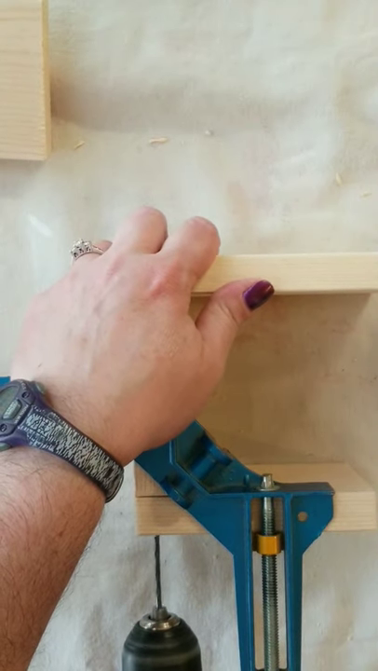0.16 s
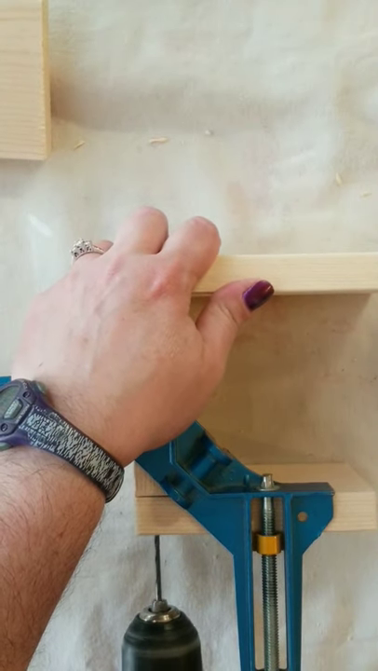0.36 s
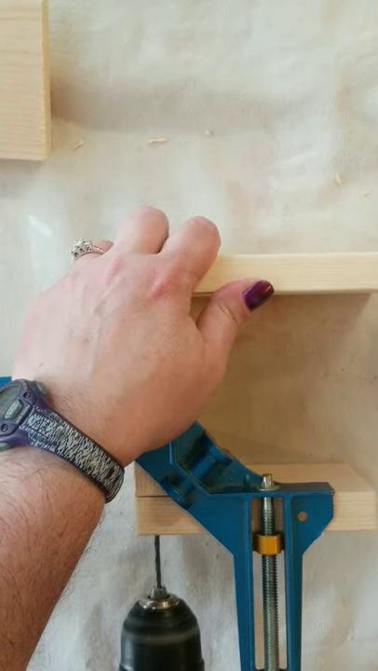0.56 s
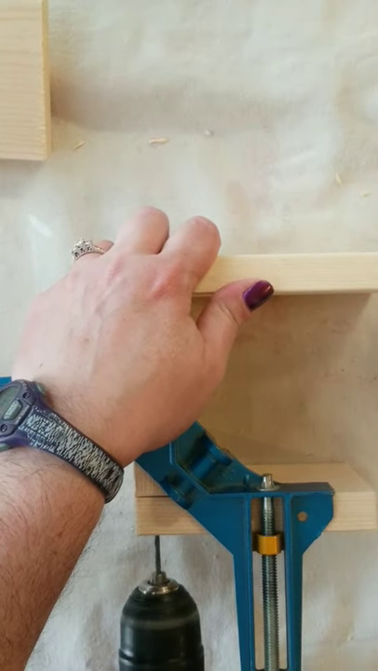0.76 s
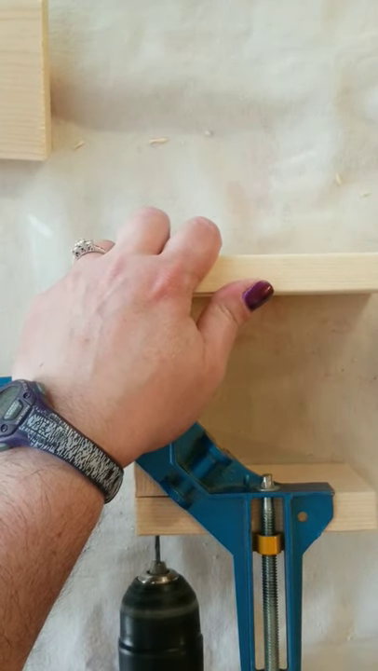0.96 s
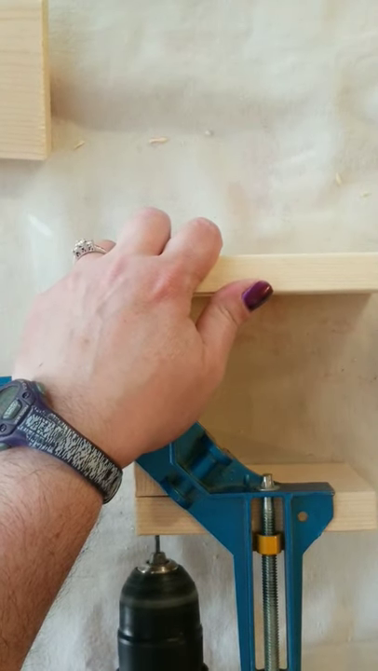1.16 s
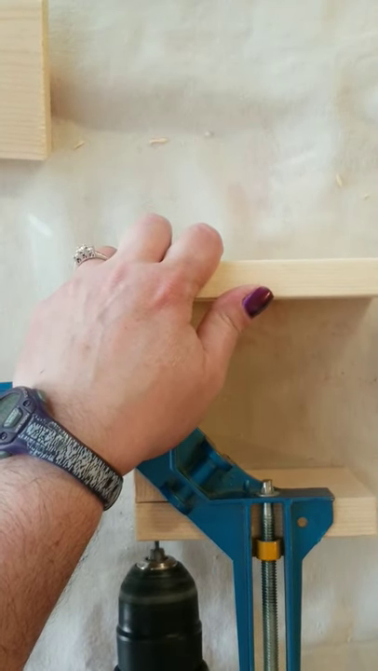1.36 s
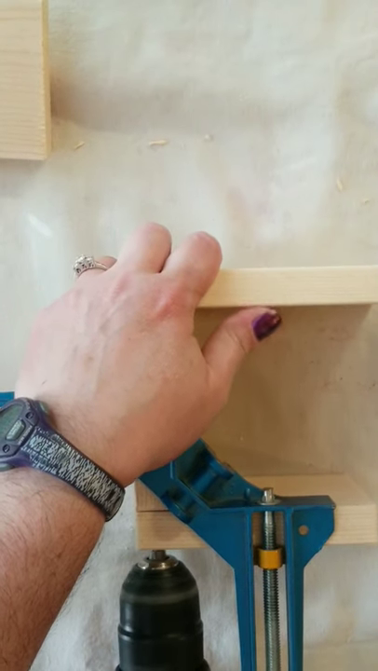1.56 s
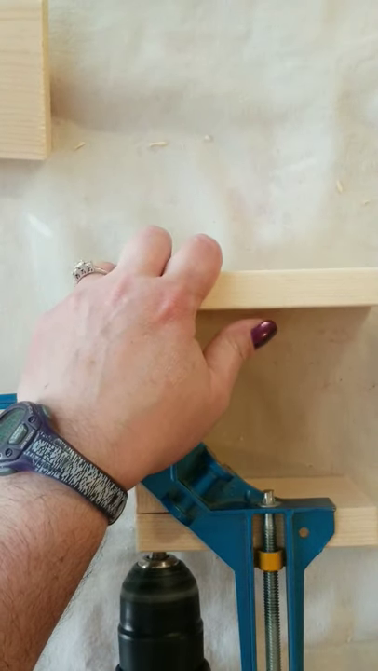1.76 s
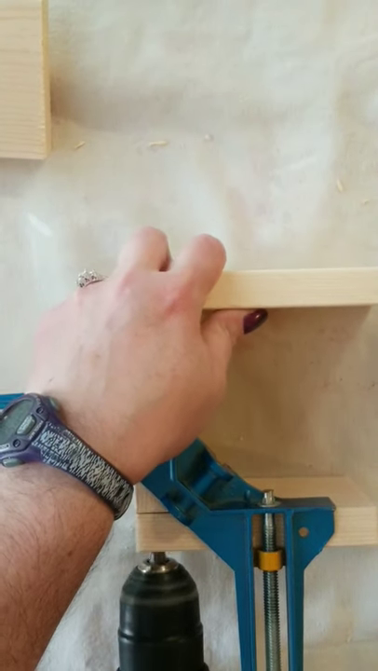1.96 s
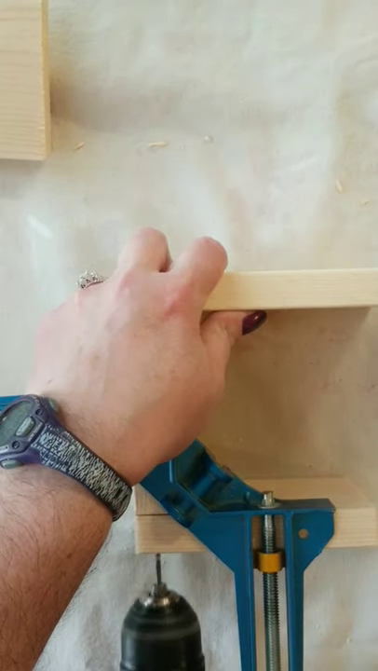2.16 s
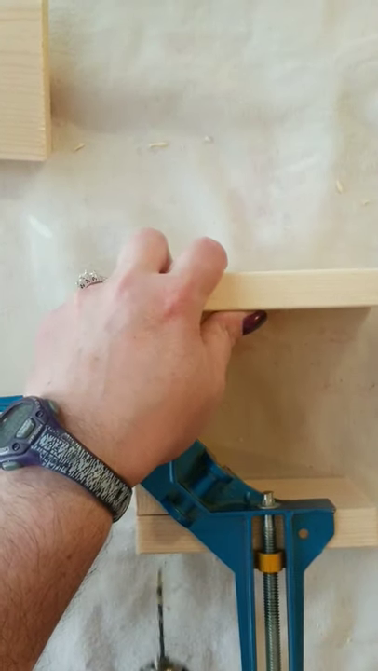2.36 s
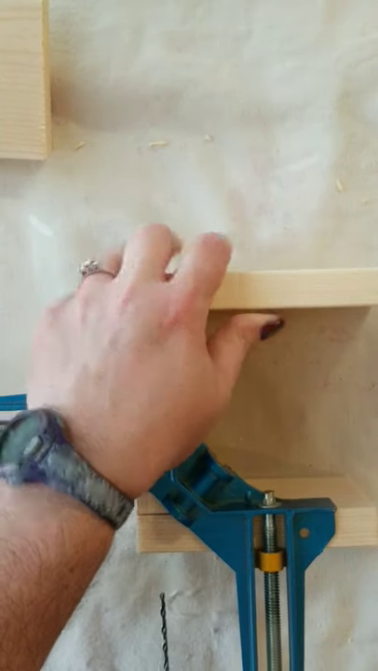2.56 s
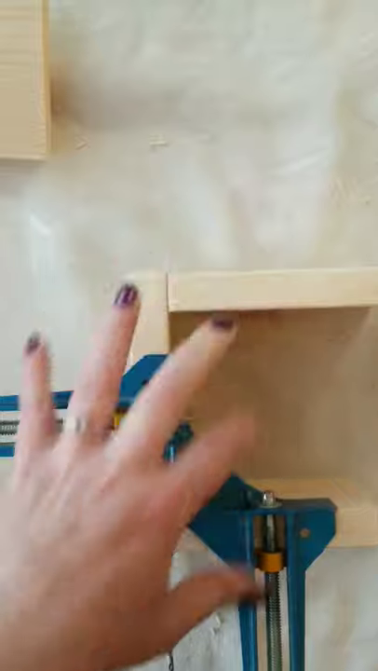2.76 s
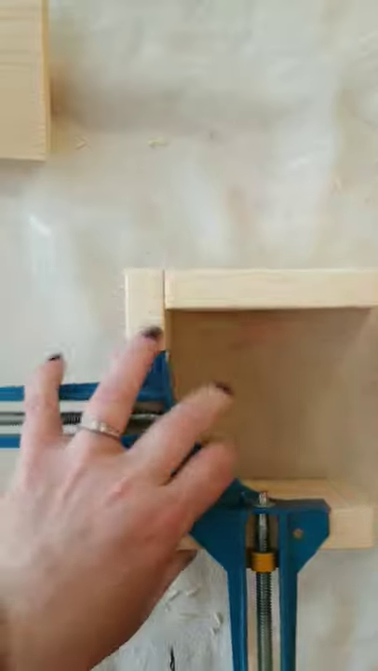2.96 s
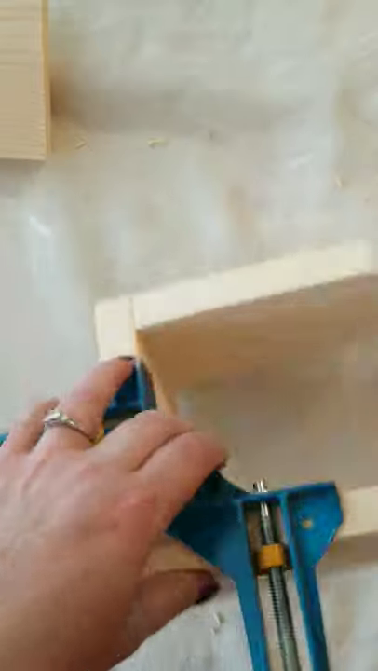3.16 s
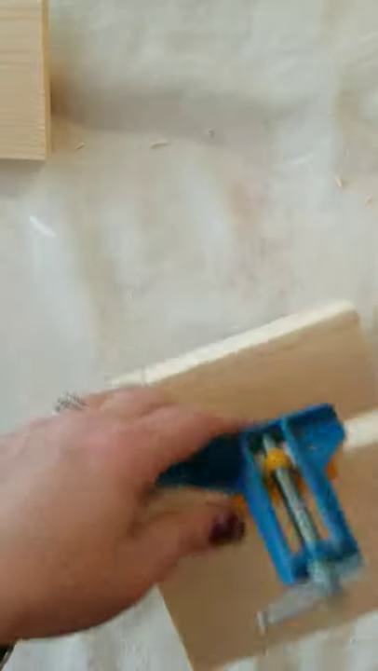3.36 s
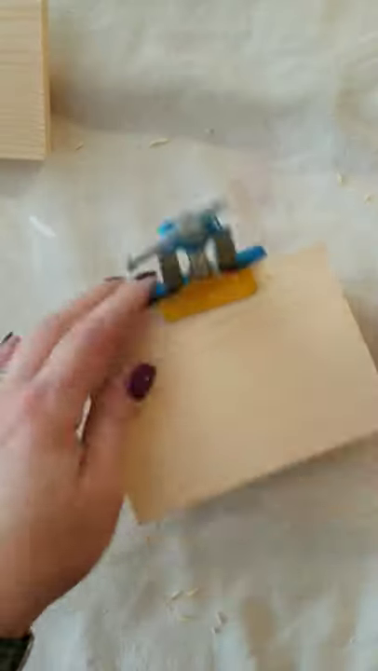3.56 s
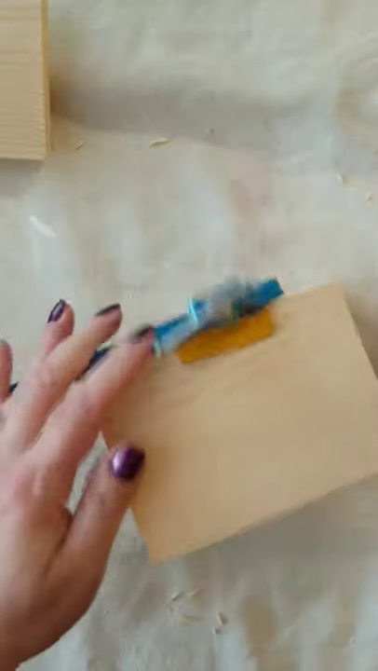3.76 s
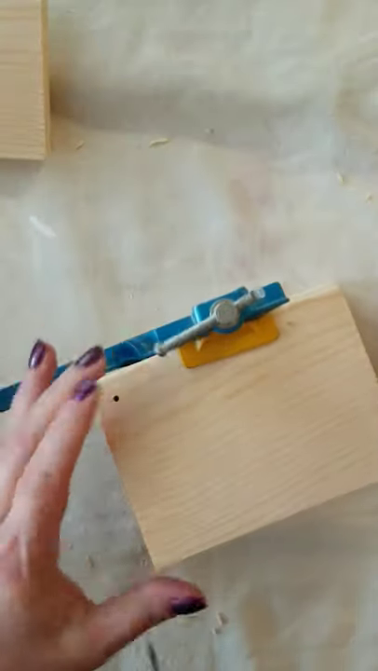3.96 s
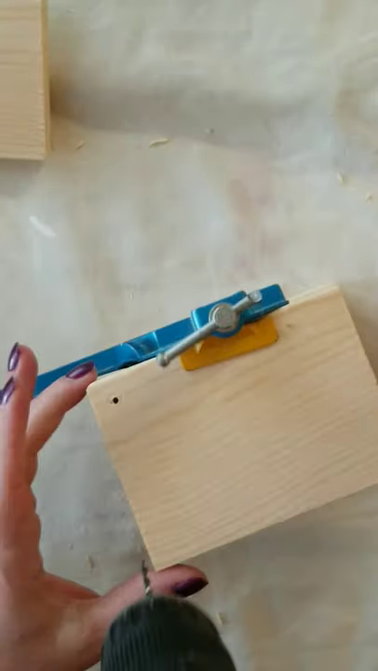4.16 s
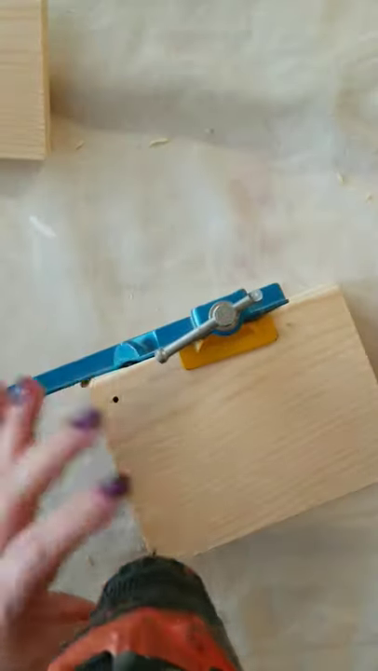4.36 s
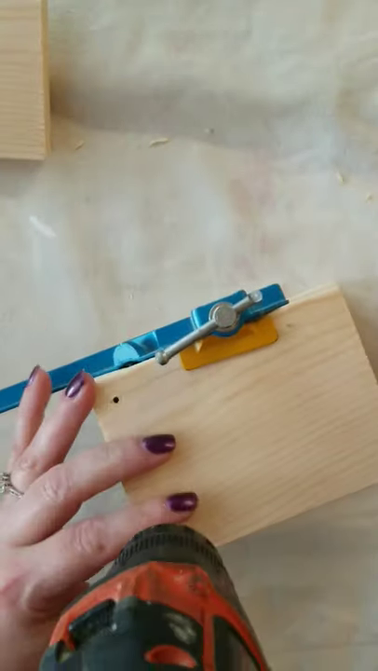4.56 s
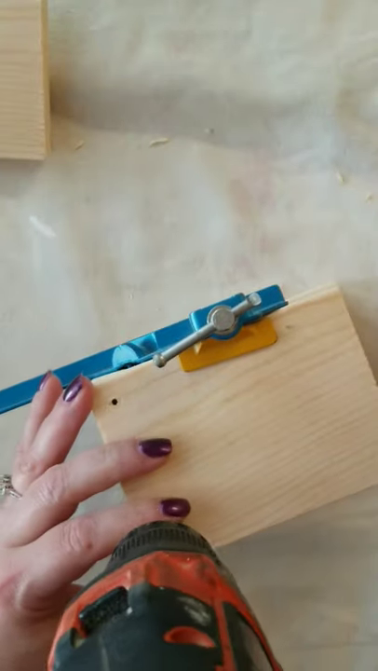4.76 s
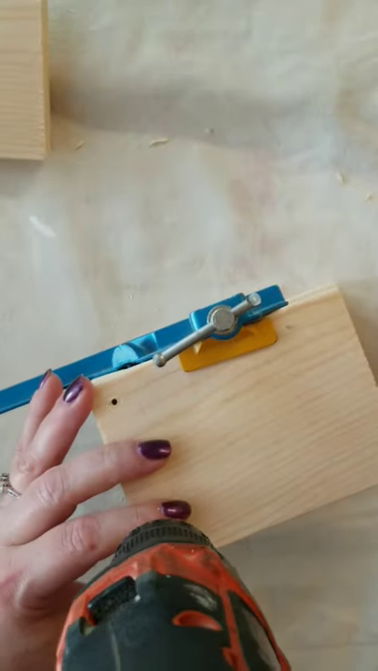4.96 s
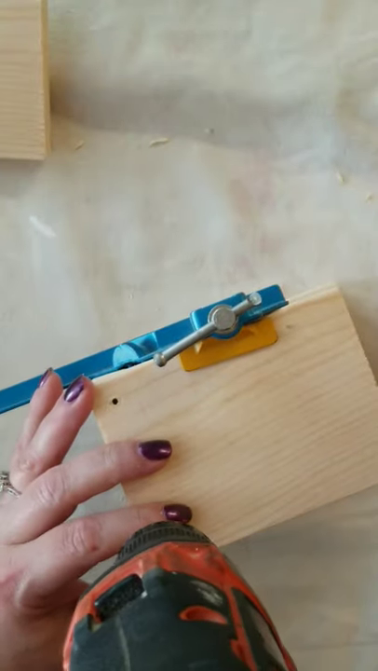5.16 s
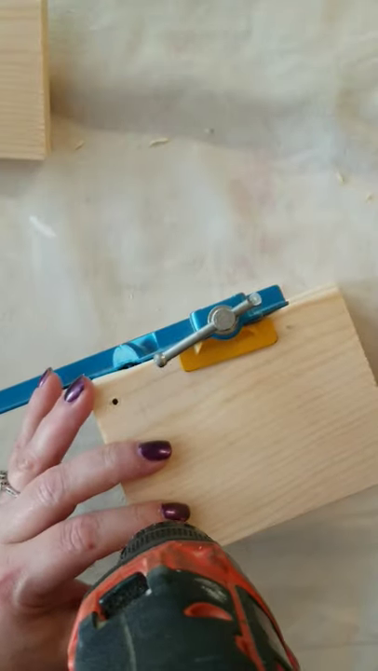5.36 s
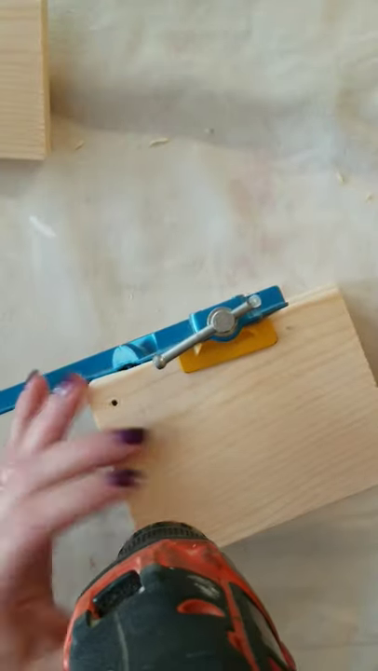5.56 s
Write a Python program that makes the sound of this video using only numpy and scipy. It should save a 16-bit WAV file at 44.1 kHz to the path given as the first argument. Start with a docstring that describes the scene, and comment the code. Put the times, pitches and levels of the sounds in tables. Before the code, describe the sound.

Close drill motor whirring and rasping through wood, stopping abruptly, followed by two heavy wooden knocks with metal clamp rattle and faint handling ticks.

```python
"""Drilling and tipping a wooden box

A cordless drill bores a pilot hole in a clamped box, sags, backs out and stops: gear, rotor and noise follow its speed.
The box lands on a cloth-covered bench in two clattering knocks: decaying modes of bench and board, metal clicks.
Filtered noise gives the ticks, slides and squeaks of hands and wood, and a quiet hiss.
Faint high chirps, gliding sines, sound far off."""
import sys
import numpy as np
from scipy import signal
from scipy.fft import rfft, irfft
from scipy.io import wavfile

SR = 44100
rng = np.random.default_rng(int(sys.argv[2]) if len(sys.argv) > 2 else 0)


def generate_wav(signal):
    """Clip the signal to [-1, 1] and save it as 16-bit WAV at the path in sys.argv[1]."""
    frames = np.transpose(np.atleast_2d(signal))
    scaled = np.clip(frames, -1, 1) * 32767
    pcm = np.round(scaled).astype(np.int16)
    wavfile.write(sys.argv[1], SR, pcm)


N = 247401
TIME, FREQS = np.arange(N) / SR, np.fft.rfftfreq(N, 1 / SR)
SPLIT = np.array([[.5], [-.5]])  # shares a left minus right difference between the sides

# Motor running up, sagging as the bit bites, recovering on the way out. Each row: time in seconds, gear hum in Hz.
SPEED = [(0, 213.8), (.1, 222.6), (.18, 241.8), (.3, 252.1), (.45, 255.6), (.6, 246.7), (1.03, 251),
         (1.5, 246.8), (1.77, 231.7), (2.1, 254.4), (2.28, 263), (2.4, 253.4), (2.5, 216.1)]
# Spectrum of the motor whirr. Each row: frequency in Hz, relative density in dB per Hz.
WHIRR = [(910, -22), (1550, -9.5), (2100, 9.5), (2270, 7), (2660, 2.5), (2930, 5.5), (3580, 3.5),
         (3890, 5.5), (5380, 2.5), (6200, 6.5), (8810, -3.5), (12300, -3), (15000, -3)]
# Spectrum of rubbing on cloth. Each row: frequency in Hz, relative density in dB per Hz.
CLOTH = [(350, -40.5), (600, -0.5), (1260, -2.5), (1690, 3.5), (1830, 1.5), (2100, 4), (2820, -1),
         (4400, 1), (6870, -2), (8990, -12), (15000, -5)]
# Ringing of the metal clamp. Each row: frequency in Hz, width in Hz, lift in dB.
CLAMP = [(1720, 200, 2.5), (3700, 320, 6), (4250, 113, 8), (5450, 100, 8), (6700, 110, 4.5), (7270, 400, 5),
         (8280, 200, 6.5), (10350, 250, 8), (12200, 250, 4.5), (12950, 250, 4), (13650, 200, 8.5)]

# one stroke: the bit sinks in, stays deep, is pulled out; then the spindle lock shuts
BITE_S, DEEP_S, PULL_S, LOCK_S = 0.27, 1.42, 2.073, 2.419
CRUISE_HZ = 250  # gear hum at cruising speed


def amp(db):
    """Decibels to gain."""
    return 10 ** (np.asarray(db) / 20)


def unit(x):
    """Scales to rms 1."""
    return x / np.sqrt(np.mean(x ** 2) + 1e-20)


def decay(age_s, t60_s):
    """Exponential fall of 60 dB in t60_s."""
    return np.exp(-np.log(1000) * age_s / t60_s)


def curve(rows):
    """A table followed through time."""
    return np.interp(TIME, *np.transpose(rows))


def read(points, hz=FREQS):
    """A table along log frequency."""
    f, value = np.transpose(points)
    return np.interp(np.log(hz + 1), np.log(f + 1), value)


def peaks(rows):
    """The lift in dB that a set of resonances gives every frequency."""
    return sum(db / (1 + (2 * (FREQS - hz) / width) ** 2) for hz, width, db in rows)


def colour(x, db):
    """Filters by a gain at every frequency."""
    return irfft(rfft(x) * amp(db), N)


def drift(hz):
    """Slow chance of rms 1, up to about hz."""
    return unit(irfft(rfft(rng.standard_normal(N)) / (1 + (FREQS / hz) ** 4), N))


def ramp(start_s, end_s):
    """Goes evenly from 0 to 1 between two times."""
    return np.clip((TIME - start_s) / max(end_s - start_s, 1 / SR), 0, 1)


def ports(pair):
    """Two unrelated signals become the two microphones: alike in the bass, apart in the treble."""
    # Each row: frequency in Hz, left-right likeness (0 to 1).
    likeness = [(40, 1), (250, 0.74), (600, 0.6), (1200, 0.16), (2500, 0.05), (15000, 0)]
    a, b = rfft(pair)
    same = np.clip(read(likeness), -1, 1)
    return irfft(np.array([a, same * a + np.sqrt(1 - same ** 2) * b]), N)


def noise():
    """White noise at both microphones."""
    return ports(rng.standard_normal((2, N)))


def add(mix, s, sound):
    """Lays a sound into the mix at s seconds."""
    part = mix[:, round(s * SR):][:, :sound.shape[-1]]
    part += sound[..., :part.shape[-1]]


def room(x):
    """Sparse reflections after 6 ms, each band dying at its own speed."""
    # Each row: frequency in Hz, t60 in seconds.
    room_t60 = [(80, 0.87), (300, 0.35), (1000, 0.4), (4000, 0.46), (12000, 0.34)]
    taps = rng.standard_normal((2, SR))
    taps *= rng.random((2, SR)) < .1
    taps *= np.arange(SR) > .006 * SR
    hz, t, z = signal.stft(taps, SR, nperseg=256)
    fade = amp(-60 * t / read(room_t60, hz)[:, None])
    tail = signal.istft(z * fade, SR, nperseg=256)[1]
    return signal.fftconvolve(x, tail / np.linalg.norm(tail[0]), axes=1)[:, :N]


def singing(rows):
    """Friction excites a narrow resonance that swells and fades."""
    out = np.zeros((2, N))
    for s, length, hz, width, db in rows:
        band = unit(colour(noise(), -20 * np.log10(1 + (2 * (FREQS - hz) / width) ** 2)))
        swell = signal.windows.hann(int(length * SR)) ** .5
        add(out, s, amp(db) * swell * band[:, :len(swell)])
    return out


def strokes(rows, attack_s, t60_s):
    """Gain of a row of movements: each swells, holds to the end of its length and dies away."""
    power = 0
    for s, length, db in rows:
        fall_db = 60 * np.maximum(TIME - s - length, 0) / t60_s
        power = power + (amp(db - fall_db) * ramp(s, s + attack_s)) ** 2
    return np.sqrt(power)


def air(db=-61):
    """The quiet hiss of the workshop: shaped steady noise."""
    # Each row: frequency in Hz, relative density in dB per Hz.
    spectrum = [(30, 6), (150, -8), (260, -6.5), (400, -6), (600, -13), (1200, -20), (1900, -19.5),
                (2700, -14.5), (3600, -22), (4600, -20), (6300, -26.5), (9500, -42), (13000, -25.5),
                (15500, -20.5)]
    return amp(db) * unit(colour(noise(), read(spectrum)))


def effort(jolt_rise_s=0.01, whirr_power=1.8):
    """Gains of cutting, whirr and bench shudder, from the depth of the bit, the speed and the brake."""
    # each in dB: level at the surface, change at full depth, change once clear of the wood
    cut_db, cut_deep_db, cut_clear_db = -38.5, 2, -7.5
    whirr_db, whirr_deep_db, whirr_clear_db = -31, -2, -5.5
    shudder_db, shudder_deep_db = -37, -6.5
    jolt_db, run_down_db_per_s = 4.5, 281  # the brake jolts the gears, then all runs down
    depth, clear = ramp(BITE_S, DEEP_S), ramp(PULL_S, 2.37)
    speed = curve(SPEED) / CRUISE_HZ
    run_down_s = np.maximum(TIME - LOCK_S - jolt_rise_s, 0)
    braking_db = jolt_db * ramp(LOCK_S - jolt_rise_s, LOCK_S) - run_down_db_per_s * run_down_s
    cut = amp(cut_db + cut_deep_db * depth + cut_clear_db * clear + braking_db)
    whirr = amp(whirr_db + whirr_deep_db * depth + whirr_clear_db * clear ** 2 + braking_db)
    whirr = whirr * speed ** whirr_power
    shudder = amp(shudder_db + shudder_deep_db * depth) * speed ** 2
    shudder = shudder * (1 - ramp(PULL_S, SPEED[-1][0]))
    return cut, whirr, shudder


def rotor(turns, odd_db=-5, blur=0.45, blur_hz=25, count=44):
    """Shaft harmonics, even ones stronger, in random phase at each microphone; seven wanders blur them."""
    out = np.zeros((2, N))
    wander = [blur * drift(blur_hz) for _ in range(7)]
    for k in range(2, count):
        for side in out:
            phase = 2 * np.pi * (k * turns + rng.random())
            phase = phase + wander[rng.integers(len(wander))] * np.sqrt(k)
            side += amp(odd_db * (k % 2)) * np.cos(phase)
    return unit(out)


def strain(mesh, full_sag_hz=18):
    """Ragged gear whine that swells as the load slows the motor, and dips in pitch with it."""
    # Each row: multiple of the gear hum, level at full sag in dB.
    orders = [(5.1, -38), (12, -46), (25.8, -48), (28.4, -43)]
    sag = np.clip((CRUISE_HZ - curve(SPEED)) / full_sag_hz, 0, 1)
    load = ramp(BITE_S, DEEP_S) * (TIME < PULL_S) * sag
    ragged = np.array([drift(50) + 1j * drift(50) for side in range(2)])
    whine = np.zeros((2, N))
    for k, db in orders:
        uneven = np.roll(ragged, rng.integers(N), axis=1)
        whine += amp(db) * unit((uneven * np.exp(2j * np.pi * k * mesh)).real)
    return load * whine


def ripple(depth_db=2.5, longest_s=.014):
    """Echoes between box, bench and tool leave fine, fixed peaks and dips at each microphone."""
    echoes = rng.standard_normal((2, N)) * (TIME > longest_s / 5) * (TIME < longest_s)
    return depth_db * unit(rfft(echoes).real)


def drill(flutter=.004, flutter_hz=22, hum_skew_rad=0.34, throb_db=1.77, cut_lines_db=-12,
          motor_lines_db=-6, beat=0.13, chatter_db=1, chip_db=-0.5, room_db=-12, skip_db=5,
          seating_time_s=0.53):
    """Gear hum, rotor whine and fan hiss follow one speed; the bit tears chips from the wood."""
    # Each row: multiple of the gear hum, relative level in dB.
    gear_orders = [(1, -1.5), (2, -25), (3, -26), (5, -39), (18, -30.5), (19, -47), (23, -46)]
    # The firmer the bit sits, the more the board hums. Each row: time in seconds, hum in dB before skipping.
    hum_level = [(0, -48.5), (.15, -43), (.26, -30), (.3, -42), (.43, -32), (.57, -30.5), (.78, -30),
                 (.86, -24), (1.38, -26.5), (1.68, -24.5), (1.85, -28.5), (1.95, -23.5), (2.14, -23),
                 (2.27, -31.5), (2.33, -59), (2.4, -45.5), (2.5, -83.5)]
    # Spectrum of cutting. Each row: frequency in Hz, relative density in dB per Hz.
    cutting = [(180, -60), (310, -6.5), (370, 5), (418, -2.5), (475, -2.5), (659, 3.5), (941, -2),
               (1220, -8), (1450, 0), (1700, -6), (2210, -59), (3740, -120)]
    # Ringing of the drill's housing. Each row: frequency in Hz, width in Hz, lift in dB.
    housing_modes = [(548, 16, 5.5), (1240, 80, 8.5), (1756, 134, 8), (2147, 27, -4), (2800, 72, 2.5),
                     (3990, 60, 0), (4400, 28, 6), (5670, 32, 7.5), (6340, 130, 2.5), (12630, 292.2, 2)]
    # The bit singing in its hole. Each row: start in seconds, length in seconds, frequency in Hz, width in Hz,
    # level in dB before pulsing.
    scrapes = [(.1, 0.45, 1366, 148.1, -44), (0.66, 0.52, 2250, 75, -44), (0.67, 0.86, 4000, 500, -42.5),
               (1.1, 0.37, 645, 230, -39), (1.5, 0.61, 1170, 160, -42), (1.8, 0.2, 1170, 170, -36.5),
               (1.25, 0.85, 6150, 700, -42), (1.92, 0.25, 646, 140, -36.5), (2.1, 0.37, 1336, 57, -41.5)]
    # Each row: frequency in Hz, left minus right in dB.
    drill_side = [(250, -3.5), (380, 4.5), (700, 1), (1290, -1), (2400, 0), (4400, -1.5), (6000, -3),
                  (7000, -2.5), (8100, -10.5), (9200, -0.5), (11300, -4), (15000, 0.5)]
    mesh = np.cumsum(curve(SPEED) * (1 + flutter * drift(flutter_hz))) / SR
    shaft = 1.275 * mesh
    skew = hum_skew_rad * np.array([[-1], [1]])  # the hum reaches the microphones out of step
    gears = np.zeros((2, N))
    for k, db in gear_orders:
        phase = 2 * np.pi * (k * mesh + rng.random()) + skew
        gears += amp(db + throb_db * drift(42)) * np.sin(phase)
    # until the bit is seated it skips in the hole, and the hum reaches the board unevenly
    loose = np.exp(-TIME / seating_time_s)
    hum = amp(curve(hum_level) + skip_db * loose * drift(74)) * unit(gears)
    housing = ripple() + peaks(housing_modes)
    whine = ports(rotor(shaft))
    # the hiss swells at every tooth and chatters as the chuck wobbles
    pulsing = unit((1 + beat * np.cos(2 * np.pi * mesh)) * amp(chatter_db * drift(32)))
    chips = unit(noise() * amp(chip_db * drift(450)))
    cut = unit(colour(chips * pulsing + amp(cut_lines_db) * whine, read(cutting) + housing))
    whirr = unit(colour(noise() * pulsing + amp(motor_lines_db) * whine, read(WHIRR) + housing))
    cut_gain, whirr_gain, _ = effort()
    rasp = cut_gain * cut + whirr_gain * whirr
    rasp = rasp + singing(scrapes) * pulsing + strain(mesh)
    return colour(hum + rasp + amp(room_db) * room(rasp), read(drill_side) * SPLIT)


def handling(grain_db=-0.5, catch_db=1.5, lump_db=1, left_db=2, rest_db=-57.5):
    """Grainy sliding on cloth, and the low shudder of the bench under drill and hands."""
    # Spectrum of the shudder. Each row: frequency in Hz, relative density in dB per Hz.
    rumble = [(15, -42.5), (25, -8.5), (45, -5), (76, -6.5), (113, -7), (167, -19.5), (185, -17),
              (240, -42), (410, -120)]
    # The bit catching and hands nudging the box. Each row: start in seconds, length in seconds, level in dB.
    jogs = [(.26, 0.071, -33), (.59, 0.018, -28.5), (.69, 0.019, -38), (1.87, 0.47, -43),
            (2.63, 0.037, -48), (2.83, 0.21, -47.5), (3.42, 0.035, -46), (3.62, 0.03, -46),
            (3.77, 0.069, -44), (3.92, 0.23, -60.5), (4.49, 0.2, -60), (5.11, 0.19, -59.5),
            (5.5, 0.16, -40.5)]
    # Wood and hands sliding on cloth. Each row: start in seconds, length in seconds, level in dB.
    slides = [(2.5, 1, -65), (3.3, 0.039, -44), (3.45, 0.086, -56), (3.53, 0.079, -47),
              (3.783, 0.033, -46.5), (3.86, 0.52, -63.5), (3.99, 0.024, -52.5), (4.065, 0.019, -51),
              (4.13, 0.016, -58), (4.291, 0.032, -42)]
    grip = amp(grain_db * drift(150) + catch_db * drift(22))  # the weave catches and lets go
    rub = unit(colour(noise() * grip, read(CLOTH)))
    shudder = unit(colour(noise(), read(rumble)) * amp(lump_db * drift(35)))
    shudder = shudder * amp(left_db * SPLIT)
    _, _, drilling = effort()
    jogging = strokes(jogs, attack_s=0.05, t60_s=0.55)
    shaking = np.sqrt(drilling ** 2 + jogging ** 2 + amp(rest_db) ** 2)
    return strokes(slides, attack_s=0.047, t60_s=0.29) * rub + shaking * shudder


def brake(db=-33, t60_s=0.016):
    """The spindle lock snaps shut as the trigger is let go: a short decaying noise."""
    age = np.maximum(TIME - LOCK_S, 0)
    return amp(db) * unit(colour(noise(), read(WHIRR))) * (age > 0) * decay(age, t60_s)


def drags(room_db=-10):
    """Squeaks of wood and clamp as they drag, and their echo in the room."""
    # Each row: start in seconds, length in seconds, frequency in Hz, width in Hz, level in dB.
    squeak_rows = [(2.5, 0.29, 3680, 2980, -64.5), (2.84, 0.71, 390, 110, -66),
                   (2.82, 0.55, 805, 600, -68.5), (3.8, 0.12, 1890, 606, -59),
                   (3.85, 0.06, 1700, 162.5, -63), (3.965, 0.023, 1740, 250, -56),
                   (3.997, 0.048, 1730, 130, -54), (4.07, 0.037, 1690, 170, -53),
                   (4.18, 0.08, 2820, 90, -70), (4.53, 0.1, 3200, 2465, -68.5),
                   (4.95, 0.54, 2880, 800, -76.5), (5.46, 0.085, 2250, 120.1, -69)]
    squeaks = singing(squeak_rows)
    return squeaks + amp(room_db) * room(squeaks)


def chirps(direct_db=-4, room_db=-3, jitter_hz=350, flicker_db=3.0):
    """Thin, rough, distant glides that level off and linger in the room."""
    # Each row: start in seconds, length in seconds, start pitch in Hz, end pitch in Hz,
    # level in dB before the direct and room gains, pitch jitter as a share of the pitch.
    glides = [(2.51, 0.069, 2790, 2720, -59.5, 0.027), (2.59, 0.14, 2620, 3100, -63.5, 0.049),
              (2.577, .05, 5450, 5380, -73, .015), (2.599, .13, 5130, 5460, -67, .016),
              (2.655, 0.026, 4350, 4250, -66, .03), (2.719, .07, 5330, 5420, -75, .015),
              (2.725, .04, 5100, 4900, -70, .03), (2.764, 0.06, 2850, 3200, -66, 0.064),
              (2.858, .175, 3200, 4280, -68, .011), (2.898, 0.12, 5700, 6330, -75, 0.012),
              (3.7, 0.037, 4120, 4280, -64, 0.078), (3.844, 0.028, 8870, 6600, -55.5, .025),
              (4.029, 0.034, 4300, 4400, -58, .035), (4.124, .036, 8400, 6170, -53, 0.024),
              (4.413, 0.064, 7530, 6600, -62.5, 0.045), (4.501, .06, 6250, 4500, -68, 0.088),
              (4.615, 0.051, 4160, 4220, -67.5, 0.026), (4.853, 0.15, 4550, 4470, -72, .011),
              (5.081, 0.25, 4530, 4460, -87, .018)]
    wobble, flicker = drift(jitter_hz), amp(flicker_db * drift(70))
    out = np.zeros((2, N))
    for s, length, start_hz, end_hz, db, jitter in glides:
        u = np.linspace(0, 1, int(length * SR))
        now = int(s * SR) + np.arange(len(u))
        hz = end_hz + (start_hz - end_hz) * (1 - u) ** 2
        hz = hz * (1 + jitter * wobble[now])
        tone = np.sin(2 * np.pi * np.cumsum(hz) / SR)
        add(out, s, amp(db) * unit(flicker[now] * np.sqrt(u * (1 - u)) * tone))
    return amp(direct_db) * out + amp(room_db) * room(out)


def ring(modes, t, rise_s, spread_rad):
    """Modes of a struck body, swelling over rise_s and reaching the microphones out of step."""
    out = np.zeros((2, len(t)))
    for k, (hz, db, t60) in enumerate(modes):
        skew = (-1) ** k * spread_rad * np.array([[1], [-1]])
        out -= amp(db) * decay(t, t60) * np.sin(2 * np.pi * hz * t + skew)
    out *= 1 - np.exp(-(t / rise_s) ** 2)
    return out / np.sqrt(np.mean(out[:, :SR // 40] ** 2))  # rms 1 over the first 25 ms


def knocks(thud_db=-1, knock_db=-3, crack_db=24, crack_s=0.0001, rattle_t60_s=0.068, room_db=-14,
           click_room_db=-7, crunch_db=-11, crunch_t60_s=0.07, chatter_db=2.5):
    """Each blow thumps the bench, rings the board, and cracks and rattles the metal clamp."""
    # Wood and clamp striking the bench. Each row: time in seconds, bench thud, board knock and click
    # in dB before the gains above, left minus right in dB, contact time in seconds.
    blows = [(3.296, -16, -24, -71.5, -0.5, 0.0031), (3.3075, -12, -25, -41.5, 10, 0.0013),
             (3.3169, -15.5, -18, -48.5, 5, 0.0004), (3.3218, -27, -33, -60.5, 2, 0.00049),
             (3.327, -14.5, -28.5, -61, 8.5, 0.002), (3.35, -49, -45, -49, -7, 0.0015),
             (3.375, -23.5, -43.5, -60.5, -3, 0.0042), (3.495, -9, -12, -72, -4, 0.0019),
             (3.5, -38, -28, -49.5, 4, .0004), (3.505, -8.5, -11, -44, 5.5, 0.00015),
             (3.511, -22, -15.5, -43.5, 5.5, 0.0005), (3.516, -14, -22.5, -37, 8.5, 0.00016),
             (3.5257, -28.5, -19, -34.5, -1, 0.00017), (3.549, -24, -34, -47, 8.5, 0.0009),
             (3.581, -53, -46, -46.5, -5, 0.00055), (3.629, -40, -50, -52.5, -14, 0.00045),
             (5.506, -43, -57.5, -68, 2, 0.0012)]
    # Each row: frequency in Hz, relative level in dB, t60 in seconds.
    bench_modes = [(69.7, 7, 0.21), (81.6, -3.5, 0.14), (133.7, -0.5, 0.16), (157.6, 0, 0.085),
                   (206, -4, 0.12), (233.6, 0, 0.16), (277.8, 3.5, 0.11)]
    # Each row: frequency in Hz, relative level in dB, t60 in seconds.
    board_modes = [(333.5, -7, 0.064), (383.5, 2.5, 0.069), (419, 15, 0.027), (551, 2.5, 0.072),
                   (590, 5, 0.046), (713.5, -2.5, 0.087), (791, -14.5, 0.063), (881, -3, 0.09),
                   (1073, -16, 0.13), (1200, -11.5, 0.061), (1300, -10, 0.05), (1480, -18, 0.045),
                   (1757, -11.5, 0.081)]
    # Spectrum of the rattle. Each row: frequency in Hz, relative density in dB per Hz.
    click_spectrum = [(820, -35.5), (1400, -3), (1920, -15.5), (2350, -17), (2590, -17), (6850, -14.5),
                      (8950, -35), (10300, -22), (15000, -26)]
    # Dense upper board modes, merged. Each row: frequency in Hz, relative density in dB per Hz.
    crunch_spectrum = [(400, -31), (800, -5), (1400, -1.5), (2200, -8), (3800, -11.5), (5500, -30),
                       (12000, -47)]
    t = TIME[:SR // 2]
    bench = ring(bench_modes, t, rise_s=0.0015, spread_rad=0.27)
    board = ring(board_modes, t, rise_s=0.00014, spread_rad=0.82)
    chatter = noise() * amp(chatter_db * drift(160))  # loose parts rattle unevenly
    rattle = unit(colour(chatter, read(click_spectrum) + peaks(CLAMP)))
    u = t / crack_s
    crack = amp(crack_db) * u * (2 - u) * np.exp(-u)  # one sharp push and its rebound
    crunch = amp(crunch_db) * unit(colour(noise(), read(crunch_spectrum)))
    wood, metal = np.zeros((2, 2, N))
    for s, thud, knock, click, pan, touch in blows:
        sides = amp(pan * SPLIT)
        push = signal.windows.hann(3 + int(touch * SR))  # longer, cushioned contact: duller blow
        upper = decay(t, crunch_t60_s) * np.roll(crunch, rng.integers(N), axis=1)[:, :len(t)]
        body = amp(thud + thud_db) * bench + sides * amp(knock + knock_db) * (board + upper)
        add(wood, s, signal.oaconvolve(body, push[None] / push.sum()))
        loose = decay(t, rattle_t60_s) * np.roll(rattle, rng.integers(N), axis=1)[:, :len(t)]
        add(metal, s, sides * amp(click) * (crack + loose))
    return wood + metal + room(amp(room_db) * wood + amp(click_room_db) * metal)


def ticks(rise_s=0.00093, grain_db=3, room_db=-9):
    """Light contacts: each a short, gritty burst in the resonance of what was touched."""
    # Nails, ring and clamp on wood. Each row: time in seconds, level in dB before the envelope,
    # frequency in Hz, width in Hz, t60 in seconds, left minus right in dB.
    contacts = [(3.302, -43, 4000, 7000, .012, -2), (3.421, -52, 4500, 5000, .07, 1),
                (3.466, -55, 5040, 3000, 0.17, 0), (3.54, -35, 3520, 6000, .015, 3),
                (3.579, -38.5, 9000, 9000, 0.036, -6), (3.655, -47, 5500, 4000, 0.044, 0),
                (3.68, -55, 5500, 4000, .06, 0), (3.719, -54, 4110, 2500, .04, 2),
                (3.751, -44, 4700, 800, .014, -3), (3.801, -46, 3000, 6000, .05, 0),
                (3.8528, -42, 4130, 4500, .035, -1), (3.927, -58, 5000, 3000, .025, -1.5),
                (3.938, -55.5, 5000, 1990, 0.033, -5), (3.95, -45, 5000, 2000, .025, -3),
                (3.968, -49.5, 4000, 4500, 0.075, -2), (3.9973, -47, 5000, 6000, 0.037, 0),
                (4.051, -50, 5000, 802, .035, 0), (4.075, -44.5, 3000, 6000, 0.043, -1),
                (4.103, -54, 7200, 1990, 0.023, 0), (4.2465, -53, 4770, 3510, .04, -5)]
    t = TIME[:SR // 5]
    hz, out = np.fft.rfftfreq(len(t), 1 / SR), np.zeros((2, N))
    grit = noise() * amp(grain_db * drift(700))
    for s, db, centre, width, t60, pan in contacts:
        piece = rfft(grit[:, int(s * SR):][:, :len(t)])
        band = unit(irfft(piece / (1 + (2 * (hz - centre) / width) ** 4), len(t)))
        envelope = (1 - np.exp(-t / rise_s)) * decay(t, t60)
        add(out, s, amp(db + pan * SPLIT) * band * envelope)
    return out + amp(room_db) * room(out)


def skid(start_s=3.579, db=-40, t60_s=0.14, catch_db=4):
    """The box slips jerkily on the cloth just after it lands, and the clamp rings along."""
    age = np.maximum(TIME - start_s, 0)
    jerky = noise() * amp(catch_db * drift(200))
    scuff = unit(colour(jerky, read(CLOTH) + peaks(CLAMP)))
    return amp(db) * scuff * (age > 0) * decay(age, t60_s)


def scene():
    """Everything at the two microphones."""
    return air() + drill() + handling() + brake() + drags() + chirps() + knocks() + ticks() + skid()


def record(dry, bass_cut_hz=46, edge_hz=15650):
    """The microphones shed the deepest bass; full-scale limit and a steep band edge."""
    high_pass = signal.butter(N=3, Wn=bass_cut_hz, btype="high", fs=SR, output="sos")
    lean = signal.sosfilt(high_pass, dry)
    edge = signal.firwin(511, edge_hz, window=("kaiser", 9), fs=SR)
    return signal.oaconvolve(np.clip(lean, -1, 1), edge[None], "same")


dry = scene()
out = record(dry)
generate_wav(out)
```